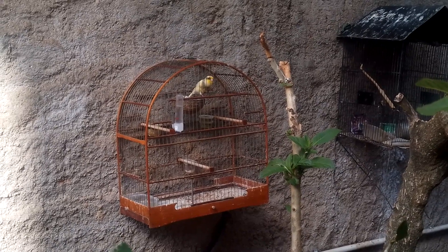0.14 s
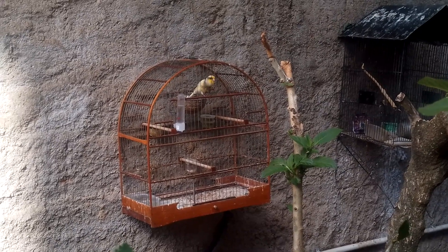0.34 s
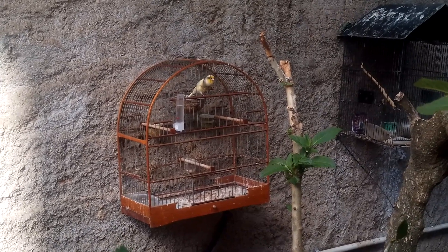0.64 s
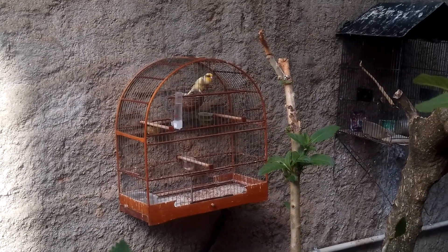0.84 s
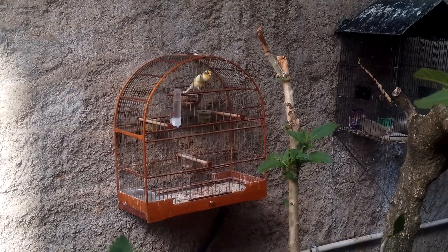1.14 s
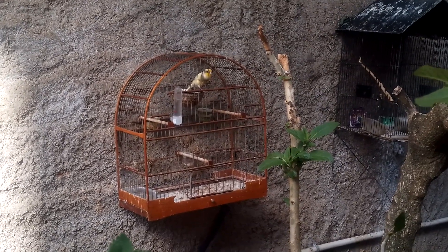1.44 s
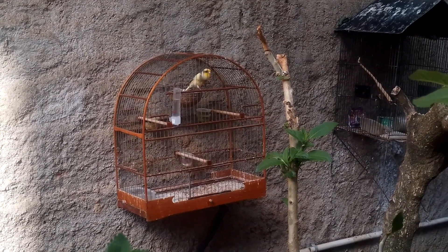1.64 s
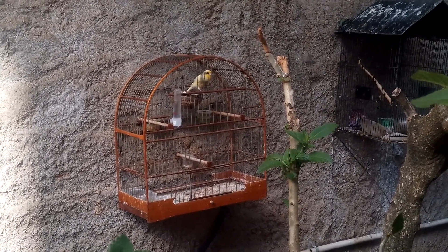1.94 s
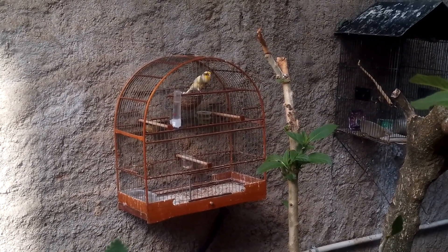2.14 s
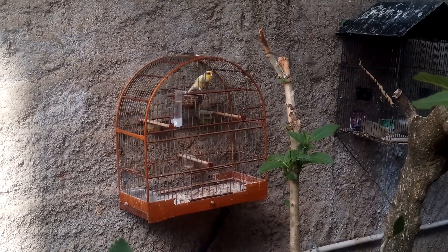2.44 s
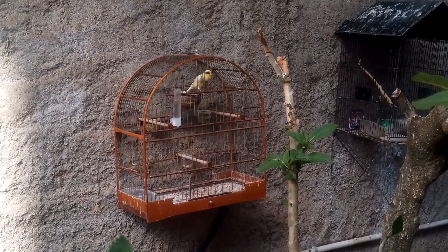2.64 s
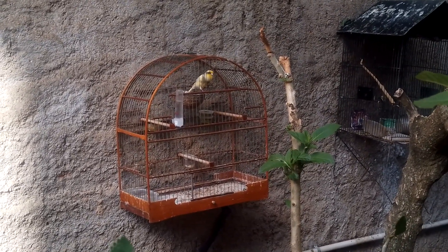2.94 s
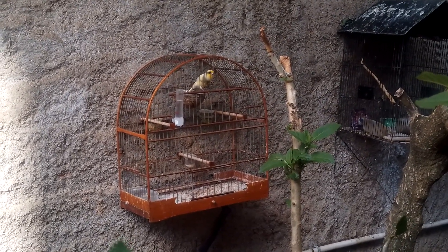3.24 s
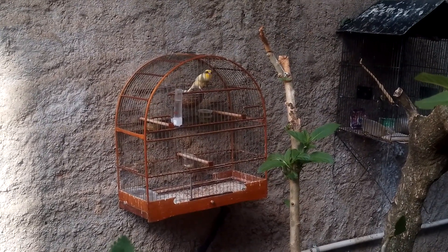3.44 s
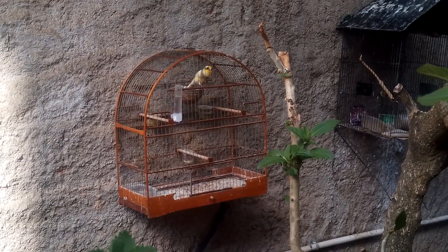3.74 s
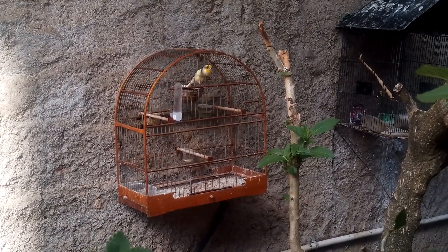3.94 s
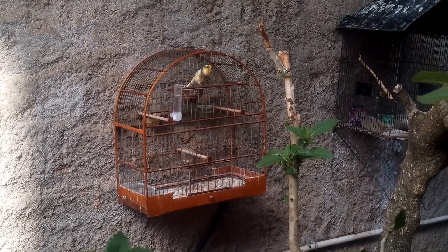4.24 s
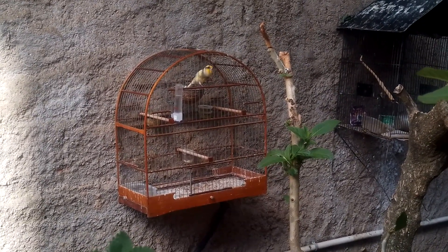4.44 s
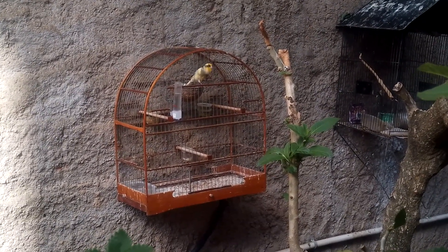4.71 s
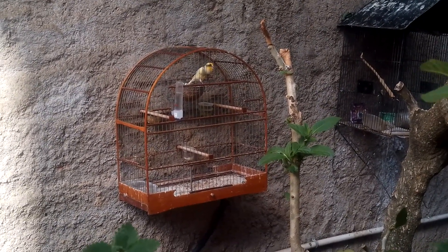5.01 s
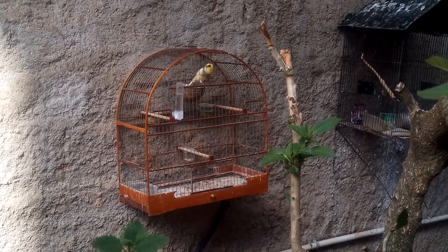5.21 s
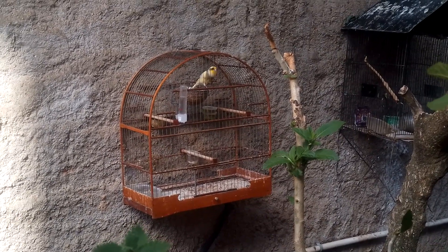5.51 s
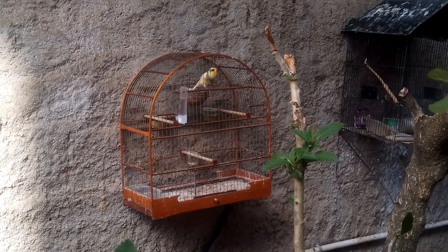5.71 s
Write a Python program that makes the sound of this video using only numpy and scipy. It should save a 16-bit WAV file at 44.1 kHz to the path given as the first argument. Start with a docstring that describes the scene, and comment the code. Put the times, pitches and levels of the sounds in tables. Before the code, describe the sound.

In a quiet yard with a brief echo off the walls, a nearby caged canary gives sharp chips and ticks among softer bird notes. Halfway through, it speeds into a rolling trill, followed by its loudest phrase, a string of pure, high falling whistles. Underneath are faint repeated dove coos, a few soft low bumps and a light outdoor hiss.

```python
"""A caged canary sings close by in a walled yard: ticks and chips, a fast roll, then loud falling slurs.
Each syllable is one pure whistle from the syrinx, sweeping downward, and each kind repeats one shape.
Other cage birds answer more softly and a dove coos far off. The walls add a short bright echo;
underneath, a few soft low bumps lie on a bed of quiet outdoor air."""
import sys
import numpy as np
from scipy import signal
from scipy.fft import rfft, irfft, next_fast_len
from scipy.io import wavfile
from scipy.ndimage import map_coordinates

SR = 44100
rng = np.random.default_rng(int(sys.argv[2]) if len(sys.argv) > 2 else 0)


def transcribe(signal):
    """Save signal, clipped to [-1, 1], as a 16-bit WAV file at the path in sys.argv[1]."""
    frames = np.atleast_2d(signal).T
    limited = np.clip(frames, -1, 1)
    pcm = np.round(limited * 32767).astype(np.int16)
    wavfile.write(sys.argv[1], SR, pcm)


N = 258867

# close reflections off wall and cage: left delay/s, right delay/s, left level/dB, right level/dB
REFLECTIONS = [(.0028, .0021, -13, -12), (.0046, .0037, -16, -13), (.0087, .0094, -17, -10),
               (.015, .0124, -20, -12), (.034, .037, -24, -20)]
# ring time of the yard: f/Hz, t60/s
YARD_DECAY = [(300, 0.34), (2500, 0.43), (6000, 0.38), (12000, 0.18)]
# EQ of the outdoor rumble, the distant wash and the bumps: f/Hz, level/dB
RUMBLE_EQ = [(20, -11), (45, -7.5), (80, 0.5), (130, -3.5), (160, -21), (220, 0.5), (330, -3.5),
             (600, -26.5), (1200, -73.5)]
WASH_EQ = [(250, -12), (500, 0.5), (800, 0.5), (1100, -9), (1450, -14), (2100, -2), (3000, -2),
           (5000, -21.5)]
BUMP_EQ = [(24, -43), (40, -36), (92, 2), (157, -14.5), (258, 8.5), (366, 5), (541, -11.5), (780, -12),
           (900, -50), (1170, -28), (1980, -120)]
# stereo EQ of the hiss, the cage birds, the canary's echo and its overtones: f/Hz, left/dB, right/dB
HISS_EQ = [(1620, -8, -9), (2450, 11.5, -11), (2940, 3, -9), (4130, -6.5, -4), (5430, 8, -4),
           (7100, -14, -23), (8400, -18, -12), (10000, -20.5, -2.5), (14000, -31, -24)]
BIRD_EQ = [(2020, 5.5, -3), (3940, -1, -13), (4250, -9, -12.5), (5207, 5.5, -10.5), (5440, -3.5, -18),
           (5430, 3, -17), (6650, -7, -29.5), (8230, -5.5, -1.5), (8550, 0, -20), (9370, -10, 9),
           (10460, -9, 14), (12200, -9, -13), (14900, 6, -11)]
ECHO_EQ = [(2100, -5.5, -17), (3150, 4, -7.5), (3870, -8.5, -17), (4595, -3.5, -9), (5220, -16, -18.5),
           (5220, -4, -18), (5700, -10.5, -17.5), (6210, -7.5, -27.5), (7530, -6, -12.5)]
OVERTONE_EQ = [(8600, -47.5, -38), (9200, -41, -25), (10100, -56, -30), (10700, -54, -33.5),
               (11180, -42, -34.5), (11440, -61, -41), (12700, -51, -49), (13300, -61, -47),
               (14000, -41, -41)]
# fader rides of the rumble and the wash: t/s, level/dB
RUMBLE_RIDE = [(.03, -77.5), (.54, -83), (1.2, -78.5), (1.59, -75), (2.15, -75), (2.33, -71), (2.94, -76.5),
               (3.42, -71.5), (3.69, -86.5), (4.13, -90), (4.5, -81), (4.96, -67.5), (5.2, -80), (5.8, -77)]
WASH_RIDE = [(0.05, -77), (1.75, -78.5), (2.52, -71.5), (3.08, -70.5), (3.51, -68.5), (4.07, -70.5),
             (4.16, -57.5), (4.36, -67), (4.85, -68.5), (4.95, -63.5), (5.17, -60), (5.45, -66),
             (5.8, -67.5)]
# soft low bumps: centre t/s, level/dB, Gaussian width/s
BUMPS = [(1.326, -62, 0.004), (1.421, -62.5, 0.023), (1.6, -60, 0.0069), (1.963, -44.5, 0.0038),
         (2.206, -54.5, 0.0052), (2.257, -55.5, 0.042), (2.366, -52.5, 0.0054), (2.409, -57, 0.0085),
         (2.523, -58, 0.012), (2.584, -57, 0.0044), (2.678, -59, 0.0048), (2.737, -61, 0.016),
         (4.429, -60, 0.022), (4.777, -49, 0.012), (4.86, -54, 0.032), (4.924, -55.5, 0.0087),
         (5.078, -46, 0.012), (5.48, -47.5, 0.0085)]

# hoarse far calls: t/s, length/s, first f/Hz, last f/Hz, mid-note bow/Hz, level/dB
FAR_CALLS = [(2.408, 0.091, 761, 799, -6, -70), (2.647, 0.096, 753, 740, 33, -73),
             (3.504, 0.087, 597, 657, -0.5, -62), (4.116, 0.11, 962, 1024, 0, -65.5),
             (4.541, 0.081, 623, 674, 3, -61.5), (4.915, 0.19, 862, 1030, 1.5, -59),
             (5.054, 0.2, 812, 759, 18.5, -56), (5.292, 0.56, 675, 566, -14, -63.5)]
# the dove's coos: t/s, length/s, crest as a share of length, crest f/Hz, last f/Hz, level/dB, swell/dB
COOS = [(0.088, 0.91, 0.61, 578, 302.3, -50.5, -4.5), (1.842, 0.37, 0.43, 366, 308, -49.5, 11.5),
        (2.883, 0.56, 0.32, 376.7, 333, -48.5, 10.5), (4.202, .55, 0.281, 385, 337.3, -46.5, 10.5),
        (5.538, 0.41, 0.44, 378, 301, -47, 14.5)]
# how fully each pitch of a coo carries: f/Hz, level/dB
COO_EQ = [(285, -8), (325, 4.5), (355, -3), (388, -7.5), (430, -1), (475, -6.5), (520, -18.5), (580, -29.5)]
# piping notes: t/s, length/s, level/dB, first f/Hz, last f/Hz
PIPING = [(1.346, 0.12, -49.5, 2453, 2518), (1.584, .14, -48, 2494, 2428), (1.852, .14, -49.5, 2457, 2437)]
# the tones in a piping note: pitch ratio, level/dB
PIPE_PARTIALS = [(0.749, -23.5), (1.002, 5), (1.25, -17.5), (1.499, -18)]
# other birds' glides: t/s, length/s, first f/Hz, last f/Hz, mid-note bow/Hz, level/dB, direct trim/dB
GLIDES = [(0, 0.016, 6380, 5840, -6, -29.5, 2), (0.112, 0.053, 6530, 6160, -27, -46, -6),
          (0.421, 0.017, 5334, 6260, 100, -61, 6), (.439, 0.053, 6320, 6390, 46, -37, 5),
          (0.545, 0.32, 2755, 2938, 90.5, -62.5, -13), (0.951, 0.079, 7377, 5630, 2, -32, -19),
          (1.034, 0.18, 2660, 2680, -0.5, -70.5, -1), (1.845, 0.1, 3790, 4180, 282, -43.5, -19),
          (2.83, 0.066, 4470, 3895, -100, -40.5, -5), (3.04, 0.086, 3950, 3740, -42, -41.5, -4),
          (3.171, 0.091, 4470, 3970, -7, -31.5, -14), (3.304, 0.12, 3984, 3760, 37.5, -33, -11.5),
          (3.218, 0.08, 3775, 2787, -200, -47.5, -25), (3.466, 0.085, 3410, 2530, -100, -47, -24),
          (3.486, 0.16, 1811, 2152, 225, -53, -22), (3.676, .19, 3930, 2720, -250, -44.5, -6),
          (3.735, 0.11, 3820, 3000, -3, -40, -19), (3.914, 0.065, 2925, 4010, 245, -40, -22),
          (4.069, 0.072, 1980, 3230, 21, -48.5, -17), (4.134, 0.099, 3226, 4660, 65, -32.5, -5),
          (4.381, .047, 6900, 5850, 8, -28, -10), (4.433, 0.08, 4605, 3806, -150, -33, -6.5),
          (4.774, 0.035, 7970, 6200, -1, -23, -14), (4.805, 0.0062, 5030, 4400, 0, -34, 2),
          (4.903, 0.0082, 4130, 3570, 3, -33.5, 1), (5.048, 0.0072, 4840, 4300, -1, -33, 8),
          (5.221, 0.083, 4230, 2980, -400, -43.5, -9), (5.473, 0.086, 4450, 4140, -1, -29, -18),
          (5.523, 0.075, 4260, 4420, 355, -29.5, -18.5), (5.665, 0.012, 6550, 6460, -2, -31, 1),
          (5.71, 0.013, 4700, 4300, -31, -34, -8)]

# syllable shapes: t/s from the centre, f/Hz, level/dB
PURR_SHAPE = [(-.006, 2780, 0.5), (-.001, 2500, 7), (.003, 2130, 4.5), (.006, 1800, -25.5),
              (.013, 1220, -17)]
PIP_SHAPE = [(-.014, 2180, -13), (-.005, 2124, 3), (.004, 2000, -5.5), (.014, 1920, -17)]
SIGH_SHAPE = [(-.028, 7194, 0.5), (-.01, 6340, -9.5), (0, 5838, 3.5), (.014, 5388, -0.5),
              (.032, 4750, -12.5), (.06, 3440, -26.5)]
RASP_SHAPE = [(-.007, 3880, 16.5), (-.003, 3265, 8), (0, 2556, 0), (.007, 2960, -13), (.025, 2513, -1),
              (.055, 2310, -6.5)]
TICK_SHAPE = [(-.003, 6830, -34), (0, 6480, -15.5), (.0018, 6200, 4.5), (.004, 3580, -11),
              (.007, 3380, -36)]
CHIP_SHAPE = [(-.026, 7900, -32), (-.018, 7020, -15.5), (-.006, 6600, -2), (0, 6200, 1), (.004, 5600, -4.5),
              (.007, 4950, -25)]
ROLL_SHAPE = [(-.009, 7400, -14.5), (-.005, 6580, -3), (-.001, 5980, 2), (.003, 5400, -5), (.007, 4880, 0),
              (.011, 4350, -11.5), (.015, 3710, -15)]
SLUR_SHAPE = [(-.046, 7873, -25), (-.037, 7050, -23), (-.028, 6360, -17.5), (-.018, 5985, -7.5),
              (-.006, 5576, -11.5), (0, 5004, -7.5), (.006, 4480, -28), (.015, 3900, -19.5),
              (.022, 3080, -40), (.028, 2410, -53)]
HURRIED_SHAPE = [(-.017, 7680, -18), (-.012, 6370, -3.5), (-.008, 5450, -13), (0, 4940, -4.5),
                 (.006, 4450, -14), (.012, 4150, -5.5), (.019, 3360, -26.5)]
# even trains of soft notes: first t/s, end t/s, period/s, first level/dB, fade/(dB/s), pitch ratio
PURRS = [(.302, .64, .0359, -47.5, 0, 0.98), (.667, .72, 0.031, -55.5, -6, 0.94)]
PIPS = [(0.036, .28, .071, -48.5, 0, 1.2), (0.773, 1.24, .084, -55, 0, 1)]
# clear, sighing falling slurs between the chips and ticks:
# t/s, level/dB, lead-in stretch, tail stretch, brightness/(dB/kHz)
SIGHS = [(.984, -33, 0.91, 1.07, -3), (1.148, -28.5, 0.52, 0.78, -1), (1.311, -25, .6, .9, 9),
         (1.427, -25.5, .8, 0.64, 1), (1.566, -24, 0.58, 1, 8.5), (1.708, -28, .9, 0.77, 0.5),
         (1.825, -30, 0.55, 1.1, 5.5), (1.941, -31, 0.76, 0.85, 1.5), (2.066, -32, 0.66, 0.97, 0),
         (2.183, -31.5, 0.99, 1, -2.5), (2.301, -30, 0.69, 0.98, -1), (2.433, -28.5, 0.86, 1.07, 2),
         (2.661, -31, 1.78, 2.3, -1.5), (2.961, -32.5, 1.84, 1.54, 0)]
# the canary's cues in order of entry; short rows leave out the last columns:
# t/s, level/dB, lead-in stretch, tail stretch, brightness/(dB/kHz), pitch ratio
TICKS = [(.006, -31), (0.077, -29.5), (0.149, -28.5), (0.222, -29), (.815, -43.5), (2.05, -23.5),
         (2.192, -25), (2.335, -19), (2.476, -21.5), (2.619, -23), (2.767, -21), (2.915, -22.5)]
CHIPS = [(.197, -19, .8, 1.7, 1, 1), (1.299, -16.5, 1.15, 1.3, -1, 0.99), (1.54, -13, .8, 1.1, 1.5, 1),
         (1.804, -13, 0.81, 1.6, -1, 0.98)]
ROLLS = [(3.117, -20.5, .5, 0.71, -2), (3.163, -17, .7, .8, -2), (3.2172, -15, 0.73, 0.65, 1.5),
         (3.265, -16, 1.1, .8, -3), (3.317, -14, 0.7, 0.97, 1), (3.369, -12, 1, 0.8, 0),
         (3.4224, -10, 0.56, 1.2, 3.5), (3.476, -12.5, .7, 1.1, 1.5), (3.53, -12.5, 0.83, 0.83, 2.5),
         (3.5796, -16, 0.65, 1, 1), (3.6316, -17, 0.56, 0.83, 0), (3.686, -14.5, 0.57, 1.1, 1.5),
         (3.7404, -14, 0.46, 0.92, 2.5), (3.8038, -12, 1.9, 0.81, 3.5)]
FIRST_SLUR = (3.893, -8, 1.02, 1.2, 0)
SLURS = [(3.9991, -4.5, 1.04, 1.06, 1.5), (4.1185, -3.5, 0.98, 0.94, 0.9), (4.2477, -6.5, 1.08, 0.92, -1.2),
         (4.3742, -6, 0.95, 0.69, -1), (4.4877, -4, 0.89, 0.9, 1), (4.602, -3, 0.96, 0.87, 1.5),
         (4.7209, -2.5, 1.07, 0.97, 1), (4.83, -5, 1.18, 1.12, -0.5), (4.946, -5, 0.96, 1.2, -2),
         (5.065, -4.5, 1, 1.3, 1), (5.187, -5, 1.09, 1.19, 0), (5.307, -3.5, 0.95, 1.06, 0),
         (5.431, -6, 1, 1.2, 2)]
HURRIED_SLURS = [(5.526, -13.5, 1.4), (5.594, -13, 1)]
# its closing note: t/s, f/Hz, level/dB
CLOSING_NOTE = [(5.676, 4730, -24), (5.695, 4150, -21), (5.712, 3840, -20), (5.732, 3285, -37),
                (5.773, 2816, -47), (5.813, 2426, -39.5), (5.85, 1990, -105)]
# fader ride of its echo send: t/s, level/dB
ECHO_RIDE = [(0, 3), (1.3, 3), (1.9, 3), (2.4, 2), (3.2, 0), (3.7, 0), (4.2, .5), (5, 0), (5.6, 1),
             (5.87, -1)]
# its song on the right side, swinging as it moves its head: t/s, level/dB
RIGHT_RIDE = [(.2, -2), (1.4, 1.5), (2.6, -3), (3.3, 2.5), (3.8, 3.5), (4.15, -1), (4.7, 0.5), (5.6, 0)]
# strength of its overtones: t/s, level/dB
OVERTONE_RIDE = [(.2, 1), (1.3, 3), (1.55, -3.5), (1.8, 2.5), (2.1, 6), (2.5, 9), (3.15, -1), (3.75, 2.5),
                 (4, 0), (4.12, 2), (4.3, 6.5), (4.58, -4), (4.75, 0), (5.1, 2.5), (5.7, 7)]

LEFT_LAG_S, TOP_HZ = .0003, 14500


def amp(db):
    """Decibels to gain."""
    return 10 ** (np.asarray(db) / 20)


def along(points, hz, column=1):
    """One column of a frequency table, read on a log axis."""
    table = np.transpose(points)
    return np.interp(np.log(hz + 1), np.log(table[0] + 1), table[column])


def ride(points):
    """A fader ride: (t/s, value) points as one value per sample."""
    return np.interp(np.arange(N) / SR, *np.transpose(points))


def wobble(rate):
    """A smooth random curve, rate knots a second."""
    return map_coordinates(rng.standard_normal(int(N * rate / SR) + 4), [np.arange(N) * rate / SR])


def filtered(x, response):
    """x shaped by a gain that depends on frequency."""
    size = next_fast_len(N + SR // 2)
    return irfft(rfft(x, size) * response(np.fft.rfftfreq(size, 1 / SR)), size)[..., :N]


def stereo_eq(x, table):
    """x with one colour on the left and another on the right."""
    return filtered(x, lambda hz: amp([along(table, hz, column=1), along(table, hz, column=2)]))


def late(x, s):
    """x delayed by s seconds."""
    return np.pad(x, (round(s * SR), 0))[:N]


def noise(eq):
    """Two unrelated noises with the given spectrum, together at rms 1."""
    pair = filtered(rng.standard_normal((2, N)), lambda hz: amp(along(eq, hz)))
    return pair / np.sqrt(np.mean(pair ** 2) + 1e-20)


def syllable(shape, s, level_db, lead=1, tail=1, tilt_db=0, ratio=1):
    """A note (t/s, f/Hz, level/dB): a shape placed, stretched, brightened and transposed."""
    offset_s, hz, db = np.transpose(shape)
    above_centre_khz = (hz - np.interp(0, offset_s, hz)) / 1000
    times = s + offset_s * np.where(offset_s < 0, lead, tail)
    return times, hz * ratio, db + level_db + tilt_db * above_centre_khz


def syllables(shape, rows):
    """One note of the same shape for each cue."""
    return [syllable(shape, *row) for row in rows]


def trains(shape, rows, scatter_db):
    """Evenly spaced notes, each a little louder or softer."""
    return [syllable(shape, s, db - fade * (s - first) + scatter_db * rng.standard_normal(), ratio=ratio)
            for first, end, period, db, fade, ratio in rows for s in np.arange(first, end, period)]


def glide(s, length, first_hz, last_hz, bow_hz, level_db, fade_db=4):
    """A note that slides along a bowed line, its ends fade_db under its middle."""
    u = np.linspace(0, 1, 25)
    arch = 1 - (2 * u - 1) ** 2
    hz = first_hz + (last_hz - first_hz) * u + bow_hz * arch
    return s + length * u, hz, level_db - fade_db * (1 - arch)


def whistle(notes, waver, waver_rate, edge_s=.0018, harmonic=1):
    """A syrinx: an unsteady sine follows each note's pitch (or a harmonic of it) and level."""
    out = np.zeros(N)
    drift = 1 + waver * wobble(waver_rate)
    for s, hz, db in notes:
        i = np.arange(max(0, int((s[0] - edge_s) * SR)), min(N, int((s[-1] + edge_s) * SR)))
        t = i / SR
        pitch = harmonic * np.interp(t, s, hz) * drift[i]
        inside_s = np.minimum(t - s[0], s[-1] - t)
        gate = np.sin(np.pi / 2 * np.clip(inside_s / (2 * edge_s) + .5, 0, 1)) ** 2
        tone = np.sin(2 * np.pi * np.cumsum(pitch) / SR) * (pitch < SR / 2)
        out[i] += gate * amp(np.interp(t, s, db)) * tone
    return out


def walls(x):
    """Wall and cage throw back a few weak copies that beat against each sweep."""
    return sum(np.array([amp(left_db) * late(x, left_s), amp(right_db) * late(x, right_s)])
               for left_s, right_s, left_db, right_db in REFLECTIONS)


def yard(x, early_db, early_t60, echoes=4, predelay_s=.005):
    """Stereo reverb: several random echo tails crossfade, so the ring varies from note to note."""
    out = np.zeros((2, N))
    blend = np.linspace(0, echoes - 1, N)
    for k in range(echoes):
        hz, t, spectrum = signal.stft(rng.standard_normal((2, SR // 2)), SR, nperseg=256)
        decay = amp(-60 * t / along(YARD_DECAY, hz)[:, None]) + amp(early_db - 60 * t / early_t60)
        tail = signal.istft(spectrum * decay, SR, nperseg=256)[1]
        tail[:, :int(predelay_s * SR)] = 0
        i = np.flatnonzero(abs(blend - k) < 1)
        send = x[i] * np.cos(np.pi / 2 * (blend[i] - k))
        echo = signal.fftconvolve(send[None], tail / np.linalg.norm(tail[0]), axes=1)[:, :N - i[0]]
        out[:, i[0]:i[0] + echo.shape[1]] += echo
    return out


def air():
    """The bed: quiet outdoor rumble, a distant wash that swells and fades, and a faint hiss."""
    rumble = amp(11 + ride(RUMBLE_RIDE) + 1.87 * wobble(10)) * noise(RUMBLE_EQ) * amp([[-7], [6]])
    wash = amp(4 + ride(WASH_RIDE) + 2.6 * wobble(33)) * noise(WASH_EQ) * amp([[1], [-1]])
    hiss = amp(-62 + .26 * wobble(1.3)) * stereo_eq(rng.standard_normal((2, N)), HISS_EQ)
    return rumble + wash + hiss


def bumps():
    """Short dull swells of low noise, panned hard right."""
    t = np.arange(N) / SR
    swell = sum(amp(db) * np.exp(-.5 * ((t - s) / width) ** 2) for s, db, width in BUMPS)
    right, other = noise(BUMP_EQ)
    return swell * np.array([amp(-34) * (right + other), amp(11) * right])


def far_calls():
    """Distant tones, so rough that each is a narrow band of noise."""
    notes = [glide(*row, fade_db=-.5) for row in FAR_CALLS]
    tone = whistle(notes, waver=.075, waver_rate=260, edge_s=.03)
    overtone = amp(-18) * whistle(notes, waver=.031, waver_rate=140, edge_s=.13, harmonic=2)
    return amp(-.5) * tone + amp(5.5) * yard(tone + overtone, early_db=16, early_t60=.4, echoes=3)


def coo(s, length, crest, crest_hz, last_hz, db, swell_db, first_hz=297.5, attack_s=.042):
    """One arch of pitch; the voice ramps by swell_db over its length and thins on the highest notes."""
    u = np.linspace(0, 1, 60)
    arch = abs(np.sin(np.pi * np.interp(u, [0, crest, 1], [0, .5, 1]))) ** 1.35
    foot_hz = np.where(u < crest, first_hz, last_hz)
    hz = foot_hz + (crest_hz - foot_hz) * arch
    attack_db = -12 * np.clip(1 - u * length / attack_s, 0, 1)
    return s + length * u, hz, db + attack_db + swell_db * (u - .5) + along(COO_EQ, hz)


def dove():
    """Husky, fluttering coos from far off, reaching the right side first."""
    voice = whistle([coo(*row) for row in COOS], waver=.04, waver_rate=190, edge_s=.015)
    voice *= amp(1.3 * wobble(25) + 3 * wobble(90))
    echo = amp(-9) * yard(voice, early_db=-20, early_t60=.08)
    return np.array([late(voice, LEFT_LAG_S), amp(1.5) * voice]) + echo


def purr():
    """A soft low roll of crisp little sweeps, with pips around it."""
    notes = trains(PURR_SHAPE, PURRS, scatter_db=.5) + trains(PIP_SHAPE, PIPS, scatter_db=1)
    roll = whistle(notes, waver=.02, waver_rate=500)
    return roll + walls(roll) + amp(-7.5) * yard(roll, early_db=-4, early_t60=.063, echoes=3)


def piping(bow_hz=45.8):
    """Clear, slightly arched and quavering notes with faint companion tones above and below."""
    notes = [glide(s, length, ratio * first_hz, ratio * last_hz, ratio * bow_hz, db + trim_db, fade_db=3)
             for s, length, db, first_hz, last_hz in PIPING for ratio, trim_db in PIPE_PARTIALS]
    pipe = whistle(notes, waver=.01, waver_rate=120, edge_s=.006) * amp(3 * wobble(45))
    return pipe + walls(pipe) + amp(-7) * yard(pipe, early_db=6, early_t60=.08, echoes=2)


def sighs_and_glides():
    """Clear sighing slurs nearby, and far birds' glides blurred by echo."""
    sigh_notes = syllables(SIGH_SHAPE, SIGHS)
    wet_notes = [glide(*row) for *row, _ in GLIDES]
    direct_notes = [glide(*row, db + trim_db) for *row, db, trim_db in GLIDES]
    sighs = whistle(sigh_notes, waver=.009, waver_rate=400) * amp(1.6 * wobble(70))
    wet_glides = whistle(wet_notes, waver=.026, waver_rate=330) * amp(3 * wobble(70))
    direct = amp(-5.5) * sighs + whistle(direct_notes, waver=.008, waver_rate=200)
    overtone = amp(-40.5) * whistle(sigh_notes, waver=.022, waver_rate=980, harmonic=2)
    echo = yard(amp(-3) * sighs + overtone + wet_glides, early_db=2, early_t60=.12)
    return direct + walls(direct) + amp([[-1.5], [1.5]]) * echo


def rasps(from_s=2, delay_s=.033):
    """Rough tails of the canary's later ticks: a quick low flick, then a diffuse patch."""
    notes = [syllable(RASP_SHAPE, s + delay_s, level_db=-46) for s, _ in TICKS if s > from_s]
    rasp = whistle(notes, waver=.085, waver_rate=900)
    return amp(-3) * rasp + amp(-3.5) * yard(rasp, early_db=8, early_t60=.06, echoes=3)


def canary():
    """The lead bird: its whistle arrives direct and as echo, its rough overtones mostly off the walls."""
    notes = syllables(TICK_SHAPE, TICKS) + syllables(CHIP_SHAPE, CHIPS) + syllables(ROLL_SHAPE, ROLLS)
    notes.append(syllable(SLUR_SHAPE[:-3], *FIRST_SLUR))  # stops short of its low tail
    notes += syllables(SLUR_SHAPE, SLURS) + syllables(HURRIED_SHAPE, HURRIED_SLURS)
    notes.append(np.transpose(CLOSING_NOTE))
    song = whistle(notes, waver=.009, waver_rate=600) * amp(1.5 * wobble(300))
    send = song * amp(ride(ECHO_RIDE) + 1.2 * wobble(9))
    echo = yard(send, early_db=4, early_t60=.12, echoes=9)
    flare = amp(ride(OVERTONE_RIDE) + 1.2 * wobble(14) + 3.5 * wobble(150))
    second = whistle(notes, waver=.025, waver_rate=800, harmonic=2)
    third = whistle(notes, waver=.025, waver_rate=800, harmonic=3)
    overtones = flare * (second + amp(-6) * third)
    sheen = amp(-3.5) * (overtones + walls(overtones))
    sheen += amp(-.5) * yard(overtones, early_db=8, early_t60=.11, echoes=6)
    left, right = stereo_eq(song + walls(song), BIRD_EQ) + stereo_eq(echo, ECHO_EQ)
    return np.array([left, amp(ride(RIGHT_RIDE)) * right]) + stereo_eq(sheen, OVERTONE_EQ)


def scene():
    """The mix: cage birds, louder but slightly later on the left, over the dove and the background."""
    left, right = canary() + stereo_eq(rasps() + purr() + piping() + sighs_and_glides(), BIRD_EQ)
    return np.array([late(left, LEFT_LAG_S), right]) + dove() + far_calls() + bumps() + air()


def record(dry):
    """A brick-wall high cut on the whole mix."""
    return filtered(dry, lambda hz: hz < TOP_HZ)


dry = scene()
out = record(dry)
transcribe(out)
```